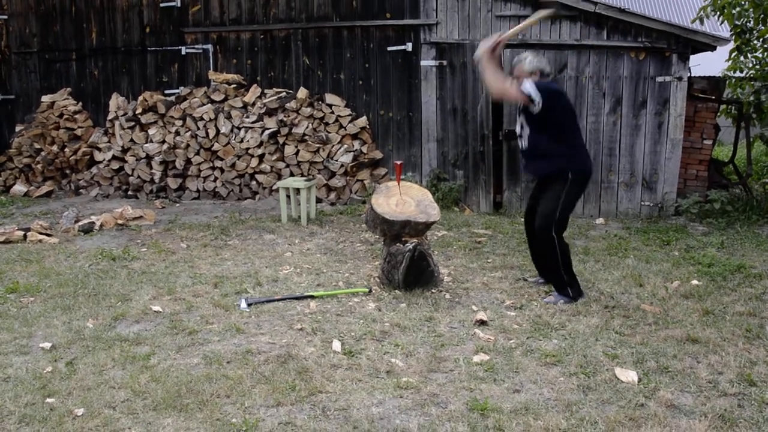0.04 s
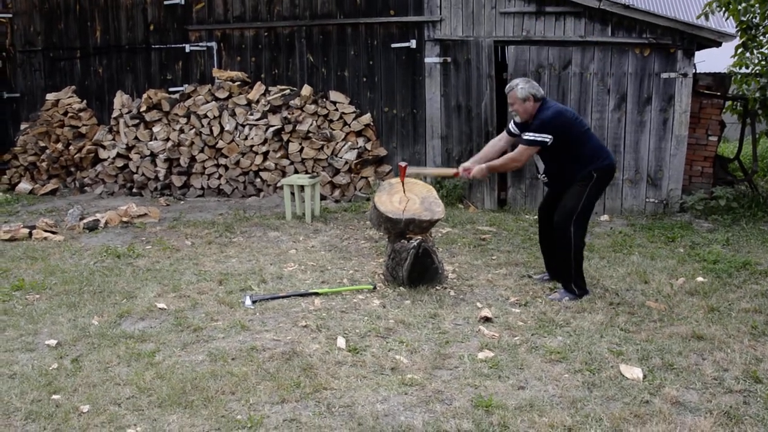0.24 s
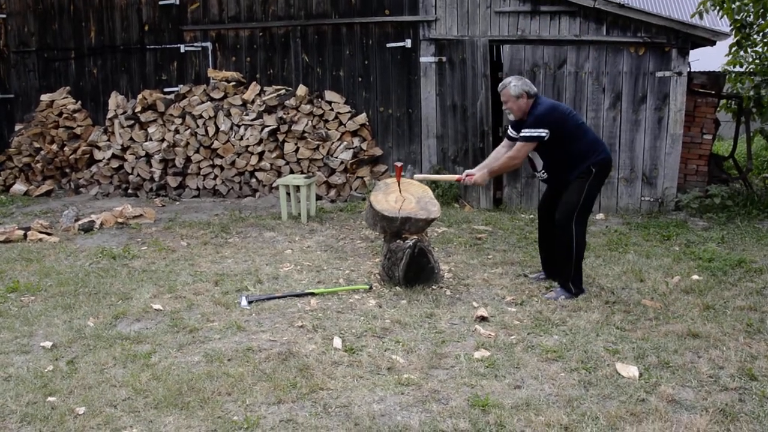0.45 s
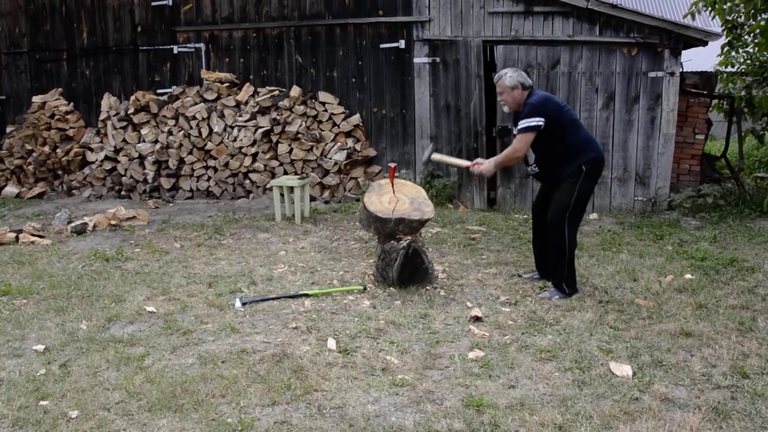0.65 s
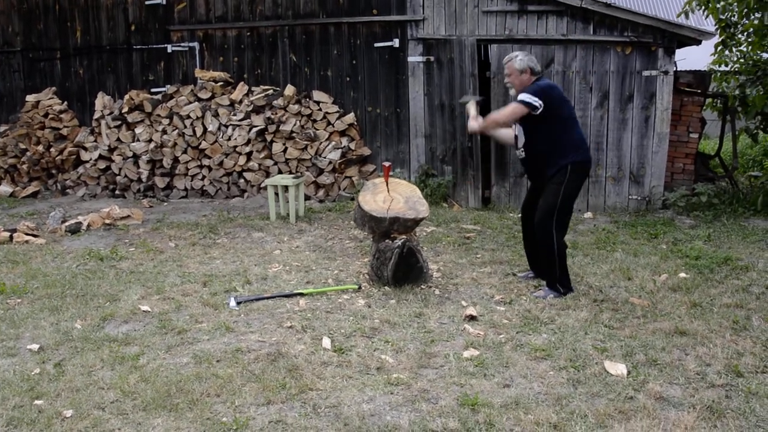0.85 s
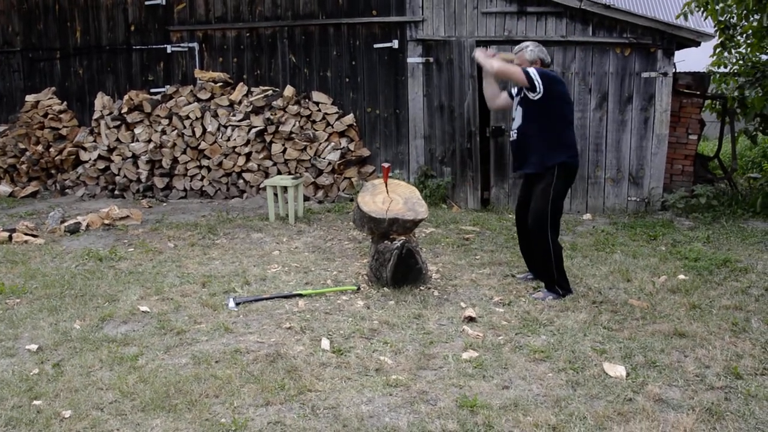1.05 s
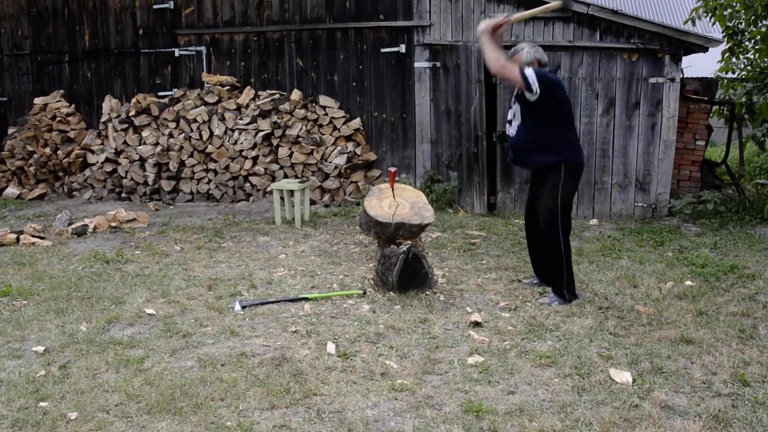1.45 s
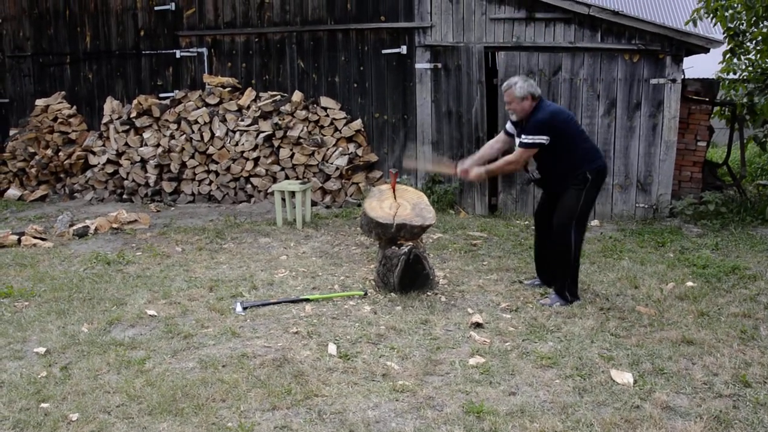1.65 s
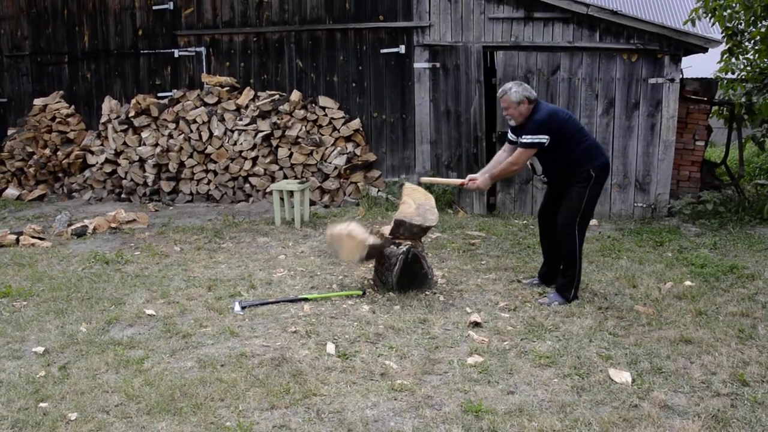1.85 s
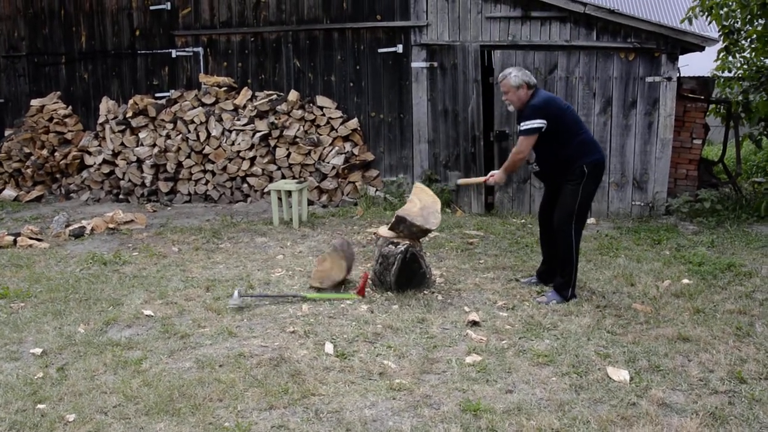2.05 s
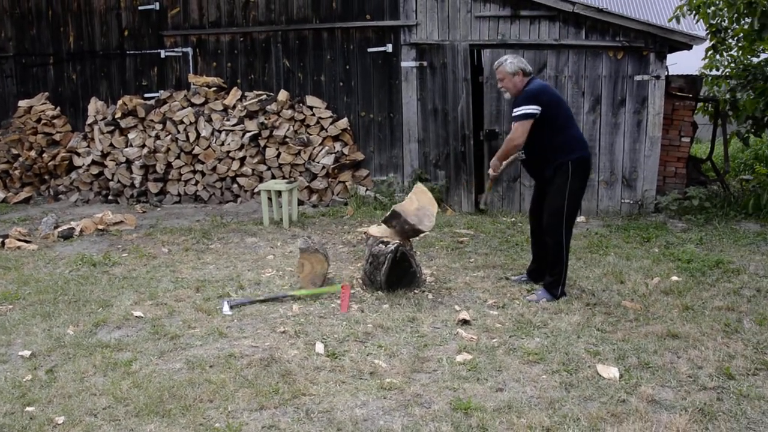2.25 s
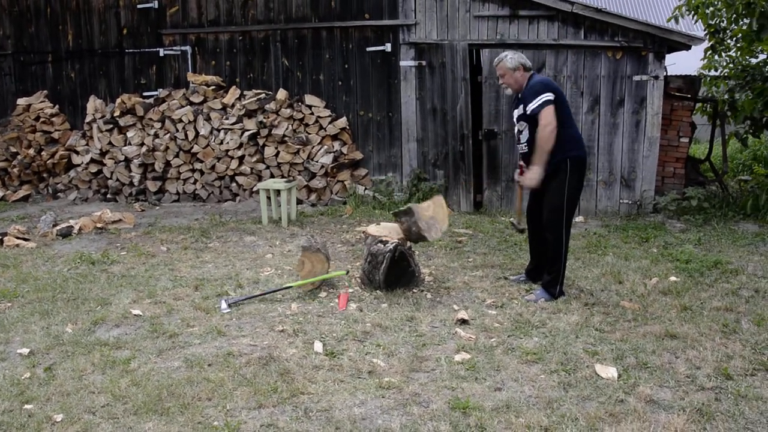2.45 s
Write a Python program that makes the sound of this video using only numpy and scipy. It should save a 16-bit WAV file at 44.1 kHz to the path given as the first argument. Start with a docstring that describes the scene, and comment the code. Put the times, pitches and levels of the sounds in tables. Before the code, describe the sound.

Two loud sledgehammer blows on a steel wedge clip the microphone in a quiet yard, with faint bird chirps and creaks between them. After the second, the log cracks apart, its halves tumbling as the freed wedge rings high.

```python
"""Splitting a log with a wedge

A sledgehammer strikes a steel wedge twice, exciting the damped modes of hammer, wedge and log. After the
first blow the hammer bounces, a foot steps softly and the log creaks. At the second it splits: the freed
wedge tumbles and rings, and the halves rub, knock and fall. The blows overload the microphone, and a shed
and a woodpile reflect them. A small bird chirps far off, over quiet air with a faint hum and whine."""
import sys
import numpy as np
from scipy import signal
from scipy.fft import rfft, irfft
from scipy.io import wavfile
from scipy.ndimage import uniform_filter1d

SR = 44100
rng = np.random.default_rng(int(sys.argv[2]) if len(sys.argv) > 2 else 0)


def dump_mix(stems):
    """Bounce the given channels to the path in sys.argv[1] as a 16-bit WAV at rate SR."""
    frames = np.atleast_2d(stems).T  # one column per channel
    limited = np.clip(frames, -1, 1)  # hard clip at full scale
    pcm = np.round(limited * 32767).astype(np.int16)
    wavfile.write(sys.argv[1], SR, pcm)


N = 110250
T = np.arange(N) / SR
HZ = np.fft.rfftfreq(N, 1 / SR)
IMPACT_RISE_S = 0.00013

# spectrum of the outdoor air (f/Hz, level/dB)
AIR_SPECTRUM = [(25, -36), (50, -23), (75, -13.5), (100, -8), (130, -17.5), (170, -9.5), (230, -19.5),
                (500, -16), (800, -14), (1400, -13.5), (2200, -19), (3400, -19), (5500, -24), (10000, -27),
                (15500, -26)]
# course of the low hum (t/s, f/Hz, level/dB)
HUM_TRACK = [(0, 190, -69), (.12, 165, -91), (.2, 165, -84.5), (.8, 170, -86.5), (0.902, 170.6, -59.5),
             (.96, 149.1, -64), (1.019, 105, -60), (1.101, 99.2, -84), (1.45, 164.6, -85),
             (1.52, 163.6, -59), (1.599, 164.6, -80.5), (2.5, 173.2, -80)]
# bird calls (t/s, level/dB)
CHIRPS = [(.140, -61), (.535, -50), (.620, -49), (.703, -47), (.790, -50), (2.375, -60)]

# hammer blows (t/s, then level/dB of crack, thump, log, hammer and wedge)
BLOWS = [(.2110, 8, -13.5, -2.5, 3.5, -18), (1.6727, 5.5, -29, -14.5, 0.5, -1)]
# spectra of the steel contact and of the thump into the block (f/Hz, level/dB)
CRACK_SPECTRUM = [(25, -38.5), (100, -30.5), (400, -16), (750, -0.5), (1600, 0.5), (2400, -1.5),
                  (4500, -8.5), (8000, -14), (12000, -10.5), (16000, -24.5)]
THUMP_SPECTRUM = [(25, -20.5), (60, -5), (120, -1.5), (300, 1), (500, -6.5), (1200, -36), (5000, -59)]
# modes of the log, the hammer head and the gripped wedge (f/Hz, level/dB, T60/s)
LOG_MODES = [(280, -24, .25), (745, -3, .07), (855, -9, .05), (1268, -8, .06), (1330, -11, .07),
             (1500, -6, .05), (1588, -4, .075), (1650, -7, .05), (1880, -7, .06), (2610, -16, .08),
             (3178, -14, .1)]
HAMMER_MODES = [(8683, -20, .15), (14275, 1, .11)]
GRIPPED_WEDGE_MODES = [(2990, -18, .25), (5820, -14, .12), (5925, -11, .24), (6735, -10, .09),
                       (10340, -8, .08), (11920, -20, .1), (12860, -13, .12), (14235, -7, .14),
                       (14360, 0, .07)]
# rebounds of the hammer head (t/s, level/dB)
REBOUNDS = [(.211, -17), (1.673, -29)]

# cracks and knocks of the wood, ticks of the bouncing hammer (0.33-0.34 s) and a soft footstep (0.656 s)
# (t/s, then level/dB of clack, thud and snap, T60/s)
SMALL_IMPACTS = [(0.229, -21.5, -26.5, -8.5, 0.016), (0.331, -34, -36, -38, 0.015),
                 (0.3405, -33, -42, -31, 0.047), (0.656, -73, -58, -74, 0.066),
                 (1.6915, -9, -15.5, -8.5, 0.059), (1.7106, -16.5, -24.5, -22, 0.025),
                 (1.7905, -27.5, -40, -18, 0.019), (1.8009, -32, -36.5, -17.5, 0.033),
                 (1.9481, -31.5, -38.5, -62, 0.18), (1.9522, -14.5, -33, -21, 0.02),
                 (1.96, -28.5, -32, -30, 0.035), (2.0588, -15.5, -56, -21.5, 0.012),
                 (2.0620, -11, -62, -47, 0.029), (2.0706, -53, -44.5, -62, 0.083),
                 (2.0817, -20, -52, -62, 0.05), (2.1170, -34, -41.5, -43.5, 0.053),
                 (2.248, -63, -36, -50, 0.044), (2.44, -48, -58.5, -48, 0.18),
                 (2.4965, -57, -61, -36, 0.06)]
# spectra of the three parts of such an impact (f/Hz, level/dB)
CLACK_SPECTRUM = [(25, -35), (100, -37.5), (400, -16), (800, 2), (1500, 4.5), (2200, 5.5), (3200, -4.5),
                  (5000, -42), (9000, -23), (16000, -49)]
THUD_SPECTRUM = [(25, -32.5), (60, -11), (110, -7.5), (170, 0.5), (300, 5.5), (480, -7.5),
                 (1200, -35), (5000, -63)]
SNAP_SPECTRUM = [(200, -25), (1500, 0), (3000, 5), (6000, -3), (10000, -8), (15000, -19)]

# wall reflections (delay t/s, level/dB, smear T60/s, cutoff f/Hz)
WALL_ECHOES = [(.0190, -15, .03, 9000), (.0385, -9, 0.057, 5000), (.1180, -24.5, 0.096, 4770),
               (0.162, -25, .05, 3800), (.2000, -28.5, 0.052, 3200)]
# spectra of wall echoes, woodpile scatter, distant echo and the side signal's gain (f/Hz, level/dB)
WALL_SPECTRUM = [(60, -17.5), (280, 0.5), (600, -10.5), (1000, -3), (1500, -3.5), (6000, 2.5), (14000, 1.5)]
SCATTER_SPECTRUM = [(25, -36.5), (100, -19.5), (280, -6.5), (450, -4), (750, -14), (1500, -10),
                    (3000, -4.5), (6000, -7.5), (9000, -9.5), (12000, -23), (15000, -37.5)]
DISTANT_SPECTRUM = [(100, -8.5), (700, -11.5), (1500, 1.5), (3200, -12.5), (6000, -21.5), (14000, -44.5)]
SIDE_SPECTRUM = [(60, -7.5), (500, -18), (1200, -16.5), (2200, -8), (4500, -5), (9000, 1.5), (14000, 0.5)]
# reverberation time of the scatter (f/Hz, T60/s)
SCATTER_T60 = [(60, 1), (300, 0.17), (700, 0.37), (1500, 0.51), (3000, 0.57), (6000, .5), (9000, .45),
               (14000, .3)]

# creaks of the strained log (t/s, level/dB)
CREAKS = [(1.2266, -39), (1.2800, -44.5), (1.2948, -34.5), (1.3320, -38.5), (1.3764, -40)]
# spectrum of a creak (f/Hz, level/dB)
CREAK_SPECTRUM = [(25, -40), (100, -27), (300, -5), (500, 6), (850, -19), (1330, 3), (1700, -7.5),
                  (3700, -14.5), (6000, -32.5), (15000, -41)]

# modes of the freed wedge (f/Hz, level/dB, T60/s, t/s of one swell)
FREE_WEDGE_MODES = [(5973, -32, 1.095, 2.9), (6756, -57.5, 2.3, 1.56), (12800, -35.5, 1.1, 2.7)]
# radiation of its lowest and highest modes as it turns (t/s, level/dB)
LOW_MODE_LEVEL = [(1.8, -65), (1.87, -45.5), (1.92, -36), (2.0, -41.5), (2.04, -57), (2.09, -59),
                  (2.17, -59), (2.22, -45.5), (2.26, -55.5), (2.3, -83)]
TOP_MODE_LEVEL = [(1.74, -23.5), (1.796, -12), (1.842, -12.5), (1.964, -40.5), (2.074, -41.5), (2.112, -33),
                  (2.208, -37.5), (2.34, -65.5)]

# strokes of a half log on the block (t/s, duration/s, level/dB)
RUBS = [(1.882, 0.024, -36.5), (1.896, 0.0316, -37.5)]
# spectrum of the friction (f/Hz, level/dB)
RUB_SPECTRUM = [(200, -39), (550, -21), (750, -2), (1150, -19), (1800, -15), (8000, -49)]
# modes of the fallen half (f/Hz, level/dB, T60/s)
HALF_LOG_MODES = [(160, -26, .1), (385, -46, .7)]


def amp(db):
    """Amplitude ratio of a level in decibels."""
    return 10 ** (np.asarray(db) / 20)


def unit(x):
    """Normalisation to rms 1."""
    return x / np.sqrt(np.mean(x ** 2) + 1e-20)


def read(points, hz):
    """Interpolation on a log-frequency axis."""
    f, value = np.transpose(points)
    return np.interp(np.log(hz + 1), np.log(f + 1), value)


def fade(t60, t=T):
    """Exponential decay by 60 dB in t60 seconds."""
    return np.exp(-np.log(1000) * t / t60)


def add(mix, s, sound):
    """Superposition of a sound on the mix from time s."""
    part = mix[round(s * SR):][:len(sound)]
    part += sound[:len(part)]


def shaped(x, spectrum):
    """Linear filtering as a product in the frequency domain."""
    return irfft(rfft(x, N) * amp(read(spectrum, HZ)), N)


def noise(spectrum):
    """Filtered white noise of rms 1."""
    return unit(shaped(rng.standard_normal(N), spectrum))


def burst(spectrum, t60):
    """Impulse response of dense modes with random phases and a common decay."""
    hz = np.fft.rfftfreq(2048, 1 / SR)
    phases = np.exp(2j * np.pi * rng.random(len(hz)))
    cluster = np.resize(irfft(amp(read(spectrum, hz)) * phases), N)
    envelope = np.minimum(T / IMPACT_RISE_S, 1) * fade(t60)
    return unit(cluster * envelope) * np.sqrt(np.mean(envelope ** 2))


def ring(modes):
    """Free vibration of a struck body: a sum of damped sinusoids."""
    t = T[:SR]
    partials = sum(amp(db) * fade(t60, t) * np.sin(2 * np.pi * (hz * t + rng.random()))
                   for hz, db, t60 in modes)
    return partials * np.minimum(t / IMPACT_RISE_S, 1)


def spread(mid, side, width):
    """Mid-side stereo: left is the sum, right the difference."""
    return np.array([mid + width * side, mid - width * side])


def background():
    """Ambient noise, partly coherent between channels, with a wavering hum and a steady whine."""
    s, hz, db = np.transpose(HUM_TRACK)
    hum_phase = 2 * np.pi * np.cumsum(np.interp(T, s, hz)) / SR
    hum = amp(np.interp(T, s, db)) * np.sin(hum_phase)
    whine = amp(-72) * np.sin(2 * np.pi * 15701 * T)
    air = amp(-58) * spread(noise(AIR_SPECTRUM), noise(AIR_SPECTRUM), width=0.56)
    return air + hum + whine


def bird(length_s=.044, start_hz=4000, end_hz=2750, roughness=.012):
    """Frequency modulation: each chirp is a falling glide with a slight random waver."""
    out = np.zeros(N)
    arch = np.hanning(round(length_s * SR))
    for s, db in CHIRPS:
        jitter = unit(uniform_filter1d(rng.standard_normal(N), size=30))[:len(arch)]
        hz = np.geomspace(start_hz, end_hz, len(arch)) * (1 + roughness * jitter)
        add(out, s, amp(db) * arch * np.sin(2 * np.pi * np.cumsum(hz) / SR))
    return out


def hammer_blows():
    """Impact excitation: steel on steel cracks, thumps the block and rings log, hammer and wedge."""
    out = np.zeros(N)
    for s, crack_db, thump_db, log_db, hammer_db, wedge_db in BLOWS:
        add(out, s, amp(crack_db) * burst(CRACK_SPECTRUM, t60=0.025))
        add(out, s, amp(thump_db) * burst(THUMP_SPECTRUM, t60=0.042))
        add(out, s, amp(log_db) * ring(LOG_MODES))
        add(out, s, amp(hammer_db) * ring(HAMMER_MODES))
        add(out, s, amp(wedge_db) * ring(GRIPPED_WEDGE_MODES))
    return out


def singing_hammer(hz=8893, rise_s=.16, t60=.43):
    """A lightly damped mode of the hammer head swells as the head lifts off the wedge."""
    out = np.zeros(N)
    tone = np.minimum(T / rise_s, 1) ** 2 * fade(t60) * np.sin(2 * np.pi * hz * T)
    for s, db in REBOUNDS:
        add(out, s, amp(db) * tone)
    return out


def small_impacts():
    """Heavily damped transients: wood cracks and knocks, the bouncing hammer ticks, a footstep thuds."""
    out = np.zeros(N)
    for s, clack_db, thud_db, snap_db, t60 in SMALL_IMPACTS:
        add(out, s, amp(clack_db) * burst(CLACK_SPECTRUM, t60))
        add(out, s, amp(thud_db) * burst(THUD_SPECTRUM, 1.26 * t60))
        add(out, s, amp(snap_db) * burst(SNAP_SPECTRUM, t60))
    return out


def yard_response():
    """Reflection and scattering: an impulse response of walls, woodpile and a faint distant echo."""
    walls = np.zeros(N)
    for s, db, t60, cutoff_hz in WALL_ECHOES:
        slap = rng.standard_normal(N) * fade(t60)
        lowpass = signal.butter(2, cutoff_hz, fs=SR)
        add(walls, s, amp(db) * signal.lfilter(*lowpass, slap / np.linalg.norm(slap)))
    hz, t, bands = signal.stft(rng.standard_normal(N), SR, nperseg=256)
    t60 = read(SCATTER_T60, hz)[:, None]
    equal_energy = np.sqrt(2 * np.log(1000) / (t60 * SR))  # whatever the band's decay time
    bands *= amp(read(SCATTER_SPECTRUM, hz))[:, None] * fade(t60, t) * equal_energy
    scatter = signal.istft(bands, SR, nperseg=256)[1][:N] * np.minimum(T / 0.016, 1) ** 2
    distant = rng.standard_normal(N) * fade(t60=3.2) * np.minimum(T / 0.28, 1)
    distant = amp(-34) * shaped(distant / np.linalg.norm(distant), DISTANT_SPECTRUM)
    return (shaped(walls, WALL_SPECTRUM) + scatter + distant)[:2 * SR]


def log_creaks():
    """The log yields under strain in short impulses, each a damped burst."""
    out = np.zeros(N)
    for s, db in CREAKS:
        add(out, s, amp(db) * burst(CREAK_SPECTRUM, t60=.028))
    return out


def tumbling_wedge(free_s=1.73, land_s=2.3, tumble_hz=4.08, doppler_hz=23.8):
    """Directional radiation: the freed wedge's modes swell and flutter as it turns; grass damps them."""
    t = np.maximum(T - free_s, 0)
    onset = np.minimum(t / 0.062, 1)
    airborne = onset * fade(0.24, np.maximum(T - land_s, 0))
    out = np.zeros((2, N))
    for hz, db, t60, swell_s in FREE_WEDGE_MODES:
        lobes = 1 + 0.29 * np.cos(2 * np.pi * tumble_hz * (T - swell_s))
        direct = lobes * np.sin(2 * np.pi * hz * t)
        band = np.exp(-((HZ - hz) / doppler_hz) ** 2 / 2)  # reflections, shifted by the motion
        mid, side = unit(irfft(rfft(rng.standard_normal((2, N))) * band, N))
        out += amp(db) * fade(t60, t) * airborne * (direct + spread(mid, side, width=0.32))
    low_hz, top_hz, twin_hz, pair_t60 = 2790, 14131, 14078, 1.36
    # the lowest mode sounds as the flat face turns forward
    s, db = np.transpose(LOW_MODE_LEVEL)
    out += amp(np.interp(T, s, db)) * onset * np.sin(2 * np.pi * low_hz * t)
    # the highest mode beats with a close twin
    s, db = np.transpose(TOP_MODE_LEVEL)
    top_rms = amp(np.interp(T, s, db)) * np.minimum(t / 0.006, 1)
    top_rms *= fade(pair_t60, np.maximum(T - s[-1], 0))
    out += np.sqrt(2) * top_rms * np.sin(2 * np.pi * top_hz * t)
    quadrature = np.array([[0], [.25]])  # left and right phase, in cycles
    twin = np.sin(2 * np.pi * (twin_hz * t + quadrature))
    return out + amp(-25) * fade(pair_t60, t) * airborne * twin


def falling_half(land_s=2.069):
    """Friction noise as a half log tips over the block, then free vibration as it lands."""
    out = np.zeros(N)
    for s, length_s, db in RUBS:
        stroke = np.hanning(round(length_s * SR))
        add(out, s, amp(db) * stroke * noise(RUB_SPECTRUM)[:len(stroke)])
    add(out, land_s, ring(HALF_LOG_MODES))
    return out


def scene():
    """Superposition of direct sound from ahead and the yard's reflections from both sides."""
    blows = hammer_blows()
    clatter = log_creaks() + small_impacts() + falling_half()
    chirps = bird()
    side = shaped(yard_response(), SIDE_SPECTRUM)[:2 * SR]
    yard = spread(yard_response(), side, width=0.65)
    incident = blows + amp(-5) * clatter + amp(-3) * chirps
    reflected = signal.fftconvolve(incident[None], yard, axes=1)[:, :N]
    return blows + clatter + chirps + reflected + singing_hammer() + tumbling_wedge() + background()


def record(dry, low_cut_hz=60, clip_level=0.93, band_limit_hz=15900):
    """Saturation: the microphone sheds deep bass and clips on the blows; a low-pass limits the band."""
    highpass = signal.butter(2, low_cut_hz, "high", fs=SR, output="sos")
    clipped = np.clip(signal.sosfilt(highpass, dry), -clip_level, clip_level)
    lowpass = signal.firwin(511, band_limit_hz, window=("kaiser", 9), fs=SR)
    return signal.oaconvolve(clipped, lowpass[None], "same")


dry = scene()
out = record(dry)
dump_mix(out)
```